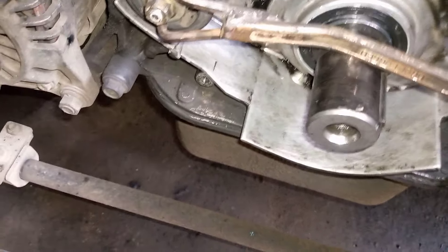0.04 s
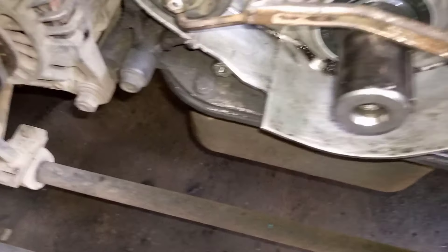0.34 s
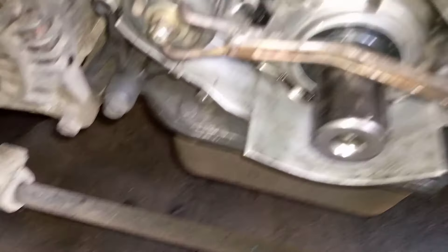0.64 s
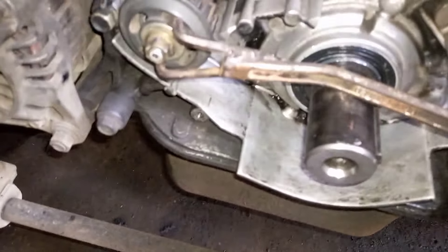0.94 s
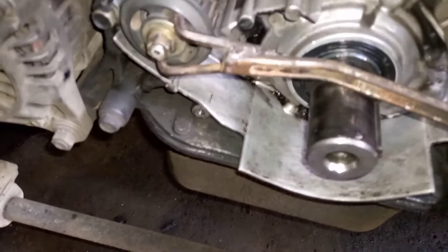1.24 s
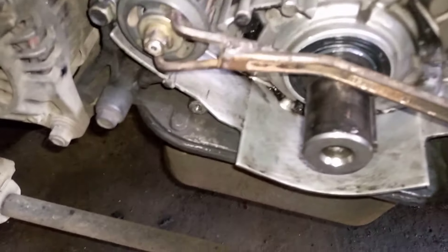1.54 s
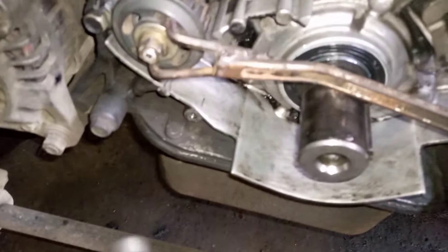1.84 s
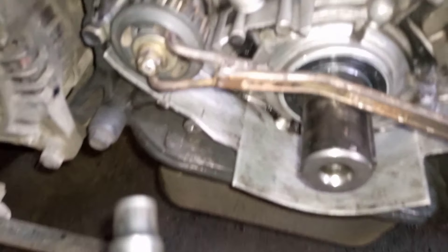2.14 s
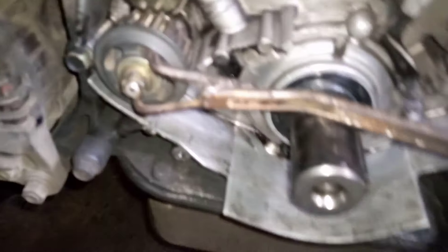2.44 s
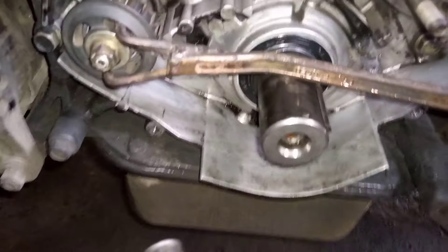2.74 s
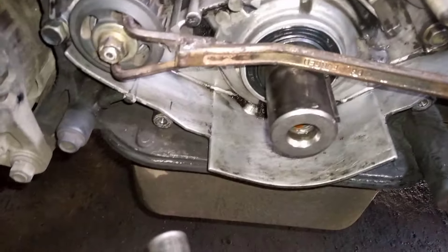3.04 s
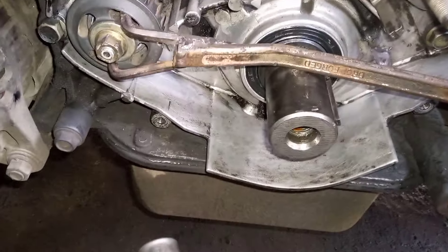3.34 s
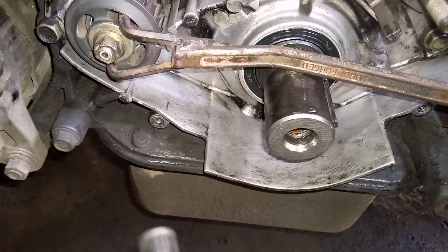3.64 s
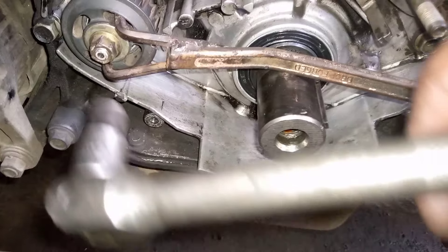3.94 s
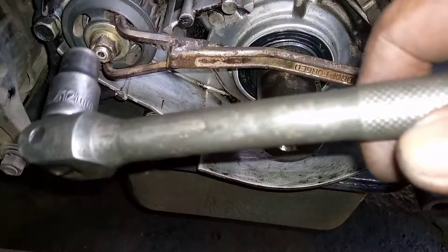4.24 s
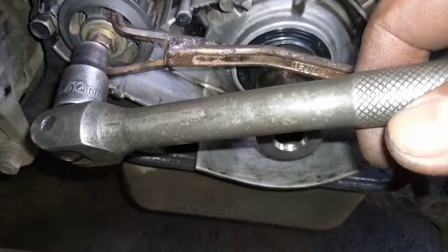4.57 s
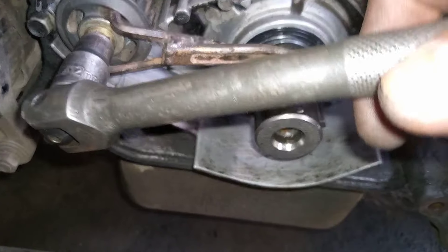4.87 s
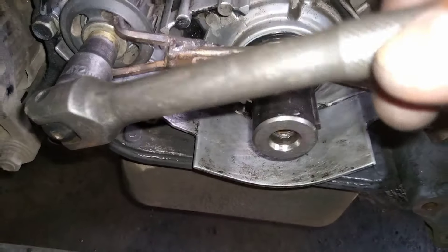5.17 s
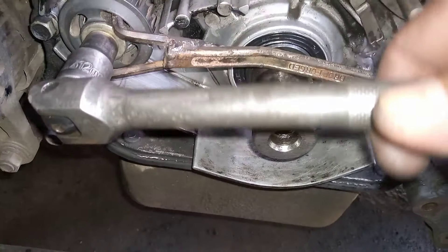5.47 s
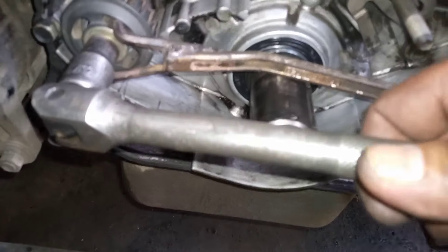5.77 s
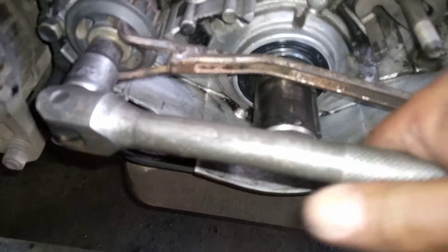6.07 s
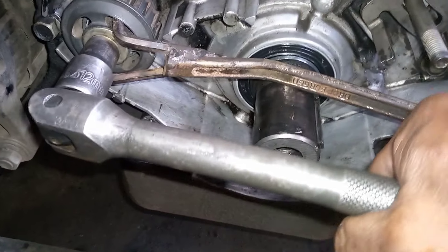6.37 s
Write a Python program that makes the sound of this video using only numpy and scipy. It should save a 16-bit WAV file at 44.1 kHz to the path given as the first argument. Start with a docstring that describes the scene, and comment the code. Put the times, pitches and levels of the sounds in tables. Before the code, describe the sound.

An engine runs outside a workshop throughout, a low, rapid, slightly uneven exhaust thudding over a steady hiss. During the first second or so, a few light, high tool ticks sound nearby, while loose metal faintly scuffs and buzzes in time with the engine. From about 2.5 seconds the engine swells and slowly gains speed, its deep boom taking on a rougher, raspy edge. It is loudest between 3 and 5 seconds, with panels clattering softly along, most noticeably near 4 seconds. Around 5 seconds the loose metal gives another brief, thin buzz and the swell fades. At 5.4 seconds a socket wrench settles on a nut close to the microphone with one sharp, short metallic clack and very little echo. The engine runs on, quieter but still slightly quickening, until the end at about 6.6 seconds.

```python
"""An engine thuds outside a workshop, each firing ringing its exhaust, over a steady hiss. In the first second
or so, metal ticks sharply and loose metal scuffs and buzzes in time with the firings. From 2.5 s the engine
swells and slowly gains speed; panels clatter most near 4 s. Near 5 s the loose metal buzzes again and the swell
fades. At 5.4 s a socket wrench clacks once as it settles on a nut; the engine runs on."""
import sys
import numpy as np
from scipy import signal
from scipy.fft import rfft, irfft, next_fast_len
from scipy.io import wavfile
from scipy.ndimage import uniform_filter1d

SR = 44100
rng = np.random.default_rng(int(sys.argv[2]) if len(sys.argv) > 2 else 0)


def wrap_up_sound(samples):
    """Save the sound to the file named by the first command line argument, as 16-bit audio."""
    columns = np.atleast_2d(samples).T
    # keep every value between -1 and 1, then stretch to whole-number steps
    tamed = np.clip(columns, -1, 1)
    steps = np.round(tamed * 32767).astype(np.int16)
    wavfile.write(sys.argv[1], SR, steps)


N = 291501
TIME_S = np.arange(N) / SR

# All table levels are relative.
# engine speed: time_s, firing_hz
SPEED = [(0, 28.8), (1, 28.4), (2, 27.2), (2.55, 27.3), (2.8, 27.7), (3.1, 28.4), (3.5, 29.6), (4, 30.7),
         (4.5, 31.6), (5, 32.5), (5.5, 33.7), (6, 34.4), (6.61, 35.5)]
# deep exhaust boom: time_s, level_db
BOOM_LEVEL = [(0, -28.5), (.09, -37), (.22, -26.5), (.4, -40), (.74, -31), (.95, -36), (1.05, -31.5),
              (1.12, -37.5), (1.34, -32), (1.48, -48.5), (1.57, -33.5), (1.85, -36.5), (2.5, -30),
              (2.72, -25), (3.07, -21), (3.7, -19.5), (4.75, -22.5), (5.08, -26.5), (5.2, -30.5),
              (5.7, -36), (6.04, -30), (6.45, -44.5), (6.61, -37.5)]
# strongest region of the boom: time_s, centre_hz
BOOM_CENTRE = [(0, 142), (.8, 146.5), (2.4, 160), (3.2, 158), (3.7, 158.8), (4.15, 157.3), (4.45, 141.6),
               (4.8, 152.5), (5.6, 140), (6.1, 145), (6.61, 160)]
# middle exhaust resonance: time_s, pitch_hz
BARK_PITCH = [(0, 315), (2.5, 269), (2.9, 299), (3.7, 276), (4.05, 249), (4.3, 301.7), (4.6, 314),
              (4.8, 256), (5.1, 277), (5.55, 244), (6.1, 260), (6.5, 305)]
# upper exhaust bands: time_s, bark_db, rasp_db
BRIGHTNESS = [(0, -39, -59), (.6, -41.5, -65), (1, -49.5, -67), (2.4, -41, -52.5), (2.97, -26.5, -32.5),
              (3.3, -27, -31), (4, -26.5, -29.5), (4.4, -23, -31.5), (4.6, -24.5, -32.5), (4.76, -25, -57),
              (5.04, -26.5, -34.5), (5.25, -37.5, -46), (5.65, -35.5, -46.5), (6, -44, -45.5),
              (6.3, -39, -51), (6.61, -44, -55)]
# noise under the boom: freq_hz, level_db
SUB_SPECTRUM = [(4, -3), (20, -9), (40, -9), (150, -50), (600, -100)]
# wall echoes: delay_s, gain
WALL_ECHOES = [(.0066, 0.17), (.016, 0.82), (0.0228, 0.53), (.035, 0.34)]
# engine sound arriving via the walls: time_s, share
WALL_SHARE = [(0, .3), (.5, .6), (2, .6), (3.1, .22), (3.35, .3), (3.65, .9), (4, 1), (4.45, .75),
              (5.05, .35), (5.3, .8)]

# socket hitting the nut: start_s, level_db
SOCKET_HITS = [(5.3877, -30), (5.3889, -21), (5.39, -29), (5.3985, -54)]
# wrench resonances: pitch_hz, level_db, t60_s
WRENCH_MODES = [(1804, -1, 0.038), (1900, -1, 0.033), (1913, -2.5, 0.031), (2224, -10, 0.06),
                (2480, 1, 0.024), (2760, -12, 0.04), (3390, 6, 0.017), (3550, -3, 0.028),
                (4060, -18, 0.025), (4560, -20, .02), (5460, -14.5, 0.044), (6410, -15, 0.088),
                (9360, -16.5, 0.03), (12100, -27, .07), (15100, -24, 0.033)]
# sharp metallic ticks: start_s, level_db, pitch_hz
METAL_TICKS = [(0.281, -40, 5850), (.4086, -35.5, 4680), (.9429, -40, 5400), (0.974, -43, 4400),
               (1.012, -40, 5440), (1.0117, -38, 6200), (1.027, -38, 6800), (1.116, -42, 6050)]

# bouts of metal chatter: peak_s, level_db, rise_db_per_s, fall_db_per_s
RATTLE_BOUTS = [(.3, -58, 10, 30), (1.02, -49, 29, 37), (4.92, -48, 85, 65)]
PANEL_BOUTS = [(3.9, -45.5, 11.5, 12)]
SCUFF_BOUTS = [(.48, -50, 10, 43)]
# resonances of that metal: pitch_hz, width_hz, level_db
RATTLE_MODES = [(4520, 150, 3), (5530, 260, 0), (5900, 300, 3), (6440, 300, 1), (6860, 360, -1),
                (9400, 1500, -7), (15100, 660, 1)]
PANEL_MODES = [(880, 26, 5), (1196, 49, 6), (1346, 78, 4.5), (3250, 110, -1.5), (4710, 140, -3.5),
               (8850, 950, -12)]
SCUFF_MODES = [(1030, 31, 2), (1830, 67, -4), (2480, 78, -5), (2720, 82, -6)]

# hiss: time_s, mid_db, treble_db
HISS_LEVEL = [(0, -46, -49.5), (.35, -45.5, -49.5), (.65, -47.5, -53), (.9, -46.5, -53.5),
              (1.01, -46.5, -51.5), (1.25, -45.5, -58), (1.7, -48.5, -59), (1.98, -46, -54.5),
              (2.25, -47.5, -60), (2.85, -43, -56), (3.28, -47, -56), (3.32, -44.5, -49.5),
              (3.55, -44, -54), (4, -44.5, -49.5), (4.8, -46.5, -53), (5.3, -47, -56), (6.61, -45.5, -53.5)]
# engine bay resonances in the hiss: centre_hz, width_hz, gain_db
BAY_MODES = [(872, 7.6, 4.5), (1194, 60, -2), (1270, 20, 4), (1940, 78, 1.5), (3510, 180, 2.5),
             (4720, 200, 0.5), (5900, 400, -0.5), (6550, 150, 2)]
# background noise: freq_hz, level_db
HISS_SPECTRUM = [(290, -12.5), (500, -3.5), (581, -7), (725, -7), (1310, -6.5), (1490, -10), (1900, -7.5),
                 (2600, -12), (3350, -13.5), (4130, -16), (6420, -15), (8000, -27), (10400, -69),
                 (17600, -120)]
FIZZ_SPECTRUM = [(5500, -32), (7000, -6), (8100, -4), (9000, 1), (10200, 0.5), (11200, -5.5), (13800, -8.5),
                 (14300, -6), (14800, 5.5), (15800, -0.5)]
RUMBLE_SPECTRUM = [(8, -26), (30, -42), (50, -15), (110, -4.5), (220, -5), (600, -32), (2000, -66)]


def engine(firings, scatter_db=6, jitter_s=0.0017, bark_lag_s=0.00442):
    """Uneven firings, each with a puff of gas, drive the exhaust's boom, bark and rasp."""
    boom_db, wet = curves(BOOM_LEVEL)[0], curves(WALL_SHARE)[0]
    bark_db, rasp_db = curves(BRIGHTNESS)
    # scales scatter and jitter; doubles per 10 dB below full bark
    uneven = np.clip(.085 * 2 ** ((-23 - bark_db) / 10), .085, .55)
    beat = np.floor(firings + .1).astype(int)
    draws = rng.standard_normal((np.ptp(beat) + 1, 2))[beat - beat[0]]
    strength, timing = uniform_filter1d(draws, size=300, axis=0).T
    force = gain_of(scatter_db * uneven * strength)
    firings = firings + timing * uneven * jitter_s * curves(SPEED)[0]
    pulses = unit_rms(force * np.diff(np.floor(firings), prepend=np.floor(firings[0])))
    pulses = delayed(pulses, bark_lag_s)
    pulses = pulses + wet * sum(gain * delayed(pulses, delay_s) for delay_s, gain in WALL_ECHOES)
    puffs = unit_rms((3 + np.exp(-(firings % 1) / .5)) * rng.standard_normal(N))
    # higher resonances carry more turbulent gas
    bark_gas, rasp_gas = .16 + 1.4 * uneven, .35 + 2.2 * uneven
    low_puffs = cut(resonate(puffs, hz=145, width_hz=49), 73, "high", order=3)
    low = force * boom(firings, wet) + uneven * unit_rms(low_puffs)
    bark = resonate(pulses + bark_gas * puffs, curves(BARK_PITCH)[0], width_hz=87)
    rasp = resonate(pulses + rasp_gas * puffs, hz=390, width_hz=215, order=3)
    rasp = cut(rasp, 329, "high", order=4)
    return (gain_of(boom_db - 33) * noise(SUB_SPECTRUM)
            - gain_of(boom_db + .47) * levelled(low)
            - gain_of(bark_db - 2.5) * levelled(bark)
            - gain_of(rasp_db - 4.5) * levelled(rasp))


def boom(firings, wet, pipe_hz=160, pipe_half_width_hz=48, band_half_width_hz=37.8):
    """Orders 2-7 of the firing rate ring the pipe, one thud a firing; the nearest wall echoes it."""
    firing_hz, centre_hz = curves(SPEED)[0], curves(BOOM_CENTRE)[0]
    thuds = np.zeros(N)
    for order in range(2, 8):
        hz = order * firing_hz
        gain = .044 * wet + (1 + ((hz - centre_hz) / band_half_width_hz) ** 2) ** -1.5
        detune = (hz - pipe_hz) / pipe_half_width_hz
        # further echoes make the orders waver and spread them in time
        waver = gain_of(2 * wet * wander(top_hz=2.473))
        smear_rad = .7 * wet * detune ** 2
        thuds += gain * waver * np.sin(2 * np.pi * order * firings - 2 * np.arctan(detune) - smear_rad)
    echo_s = .01339 - .00087 * TIME_S  # shrinking delay slides the notches
    return levelled(thuds + .72 * wet * delayed(thuds, echo_s))


def crank(zero_s=3.2055):
    """Running count of firings, zero at zero_s."""
    firings = np.cumsum(curves(SPEED)[0]) / SR
    return firings - np.interp(zero_s, TIME_S, firings)


def wrench(crack_decay_s=.0043, clack_decay_s=.01):
    """The socket chatters onto the nut, ringing the wrench; a short burst of contact noise dies away as a
    clack."""
    t, out = np.arange(SR // 4) / SR, np.zeros(N)
    for start_s, hit_db in SOCKET_HITS:
        ring = sum(gain_of(db - 60 * t / t60_s) * np.sin(2 * np.pi * hz * (t + start_s))
                   for hz, db, t60_s in WRENCH_MODES)
        contact = cut(rng.standard_normal(len(t)), 1400, "high", order=6)
        crack = gain_of(-3) * np.exp(-t / crack_decay_s) * cut(contact, 7000, "low")
        clack = np.exp(-t / clack_decay_s) * cut(contact, 4500, "low")
        add(out, start_s, gain_of(hit_db - 8.5) * (ring + crack + clack))
    return out


def ticks(t60_s=.031):
    """Sharp metallic ticks, one damped mode each."""
    t, out = np.arange(SR // 4) / SR, np.zeros(N)
    for start_s, db, hz in METAL_TICKS:
        add(out, start_s, gain_of(db - 60 * t / t60_s) * np.sin(2 * np.pi * hz * t))
    return out


def buzz(firings, bouts, modes, lag_cycles, decay_cycles, scatter_db=2):
    """Loose metal chatters and rings once a firing, in bouts that rise and fall."""
    cycles = firings - lag_cycles
    beat = np.floor(cycles).astype(int)
    force = gain_of(scatter_db * rng.standard_normal(np.ptp(beat) + 1))[beat - beat[0]]
    chatter = force * np.exp(-(cycles % 1) / decay_cycles) * rng.standard_normal(N)
    metal = sum(gain_of(db) * resonate(chatter, hz, width_hz, order=1) for hz, width_hz, db in modes)
    envelope = sum(gain_of(db - np.maximum(rise * (peak_s - TIME_S), fall * (TIME_S - peak_s)))
                   for peak_s, db, rise, fall in bouts)
    return envelope * unit_rms(metal)


def hiss(firings, throb_depth=.019):
    """Hiss throbbing slightly with the engine, with a thin fizz high in the treble, over a faint rumble."""
    mid_db, treble_db = curves(HISS_LEVEL)
    high_db = .3 * mid_db + .7 * treble_db + 1.58
    mid = gain_of(mid_db) * unit_rms(cut(noise(HISS_SPECTRUM, BAY_MODES), 2330, "low"))
    high = gain_of(high_db) * unit_rms(cut(noise(HISS_SPECTRUM, BAY_MODES), 2730, "high"))
    fizz = gain_of(treble_db + 1.8) * noise(FIZZ_SPECTRUM)
    rumble = gain_of(-39.5) * noise(RUMBLE_SPECTRUM)
    throb = 1 + throb_depth * np.cos(2 * np.pi * (firings - .25))
    return (mid + high + fizz) * throb + rumble


def room(x, level_db=-13, t60_s=.11, gap_s=.004):
    """Direct sound plus a short diffuse tail."""
    t = np.arange(SR // 4) / SR
    tail = rng.standard_normal(len(t)) * gain_of(-60 * t / t60_s) * (t > gap_s)
    return x + gain_of(level_db) * signal.oaconvolve(x, tail / np.linalg.norm(tail))[:N]


def gain_of(db):
    """Decibels to amplitude."""
    return 10 ** (np.asarray(db) / 20)


def unit_rms(x):
    """Scales to rms 1."""
    return x / np.sqrt(np.mean(x ** 2) + 1e-20)


def levelled(x, window_samples=4400):
    """Scales to a running rms of 1; single beats survive."""
    power = uniform_filter1d(uniform_filter1d(x ** 2, window_samples), window_samples)
    return x / np.sqrt(abs(power) + 1e-20)


def curves(rows):
    """Columns of a timed table, per sample."""
    time_s, *columns = np.transpose(rows)
    return [np.interp(TIME_S, time_s, column) for column in columns]


def noise(spectrum, peaks=()):
    """Shaped noise with resonant bumps, rms 1."""
    freq_hz, level_db = np.transpose(spectrum)
    size = next_fast_len(N)
    hz = np.fft.rfftfreq(size, 1 / SR)
    shape_db = np.interp(np.log(hz + 1), np.log(freq_hz + 1), level_db)
    shape_db += sum(db * np.exp(-.5 * ((hz - peak_hz) / width_hz) ** 2) for peak_hz, width_hz, db in peaks)
    return unit_rms(irfft(rfft(rng.standard_normal(size)) * gain_of(shape_db), size)[:N])


def wander(top_hz, count=12):
    """Slow random drift, rms 1."""
    time_s, hz = np.linspace(0, N / SR, count * 40), np.geomspace(top_hz / 4, top_hz, count)
    sines = np.sin(2 * np.pi * (np.outer(time_s, hz) + rng.random(count)))
    return np.interp(TIME_S, time_s, unit_rms(sines.sum(1)))


def cut(x, hz, kind, order=2):
    """Low-pass or high-pass."""
    return signal.sosfilt(signal.butter(order, hz, kind, fs=SR, output="sos"), x)


def resonate(x, hz, width_hz, order=2):
    """Resonance tracking hz; each order steepens the skirts."""
    carrier = np.exp(2j * np.pi * np.cumsum(hz * np.ones(len(x))) / SR)
    pole = np.exp(-np.pi * width_hz / SR)
    baseband = x / carrier + 1e-18
    for _ in range(order):
        baseband = signal.lfilter([1 - pole], [1, -pole], baseband)
    return 2 * (carrier * baseband).imag


def delayed(x, delay_s):
    """Constant or varying delay."""
    return np.interp(TIME_S - delay_s, TIME_S, x, left=0)


def add(mix, start_s, sound):
    """Mixes a sound in at start_s."""
    part = mix[round(start_s * SR):][:len(sound)]
    part += sound[:len(part)]


def scene():
    """All sources, mono."""
    firings = crank()
    rattle = buzz(firings, RATTLE_BOUTS, RATTLE_MODES, lag_cycles=.2, decay_cycles=.52)
    clatter = buzz(firings, PANEL_BOUTS, PANEL_MODES, lag_cycles=.17, decay_cycles=.54)
    scuff = buzz(firings, SCUFF_BOUTS, SCUFF_MODES, lag_cycles=.077, decay_cycles=.81)
    return (engine(firings) + hiss(firings) + rattle + clatter + scuff + room(wrench() + ticks()))[None]


def record(dry):
    """Steep low-pass at 15.8 kHz."""
    return signal.oaconvolve(dry, signal.firwin(511, 15800, window=("kaiser", 9), fs=SR)[None], "same")


dry = scene()
out = record(dry)
wrap_up_sound(out)
```